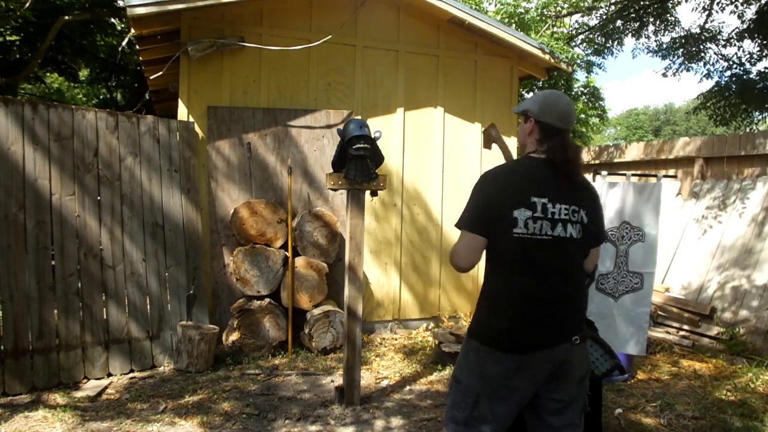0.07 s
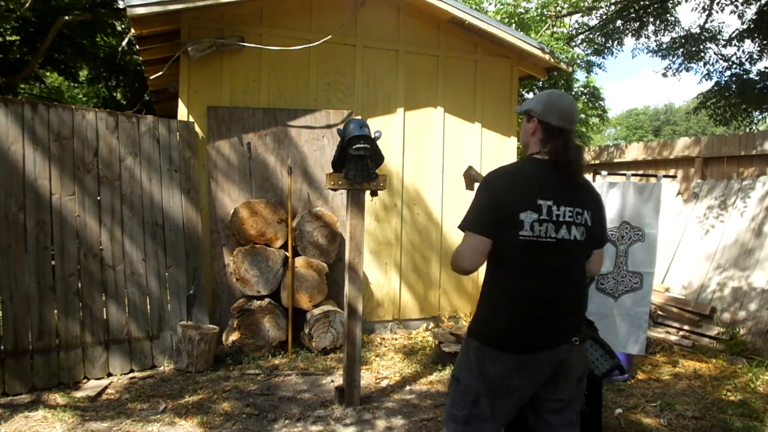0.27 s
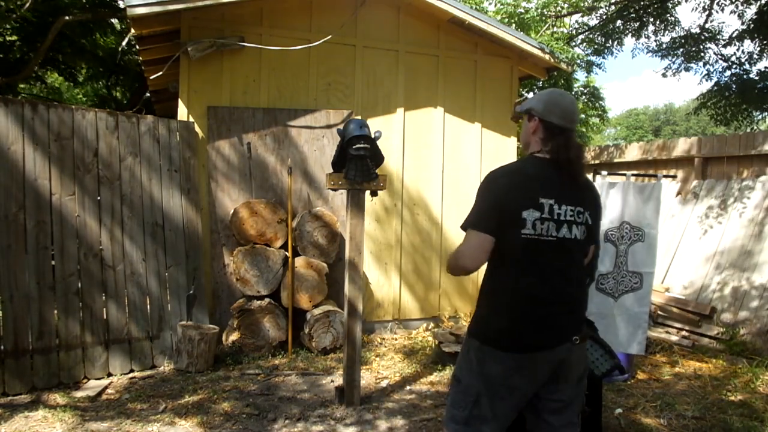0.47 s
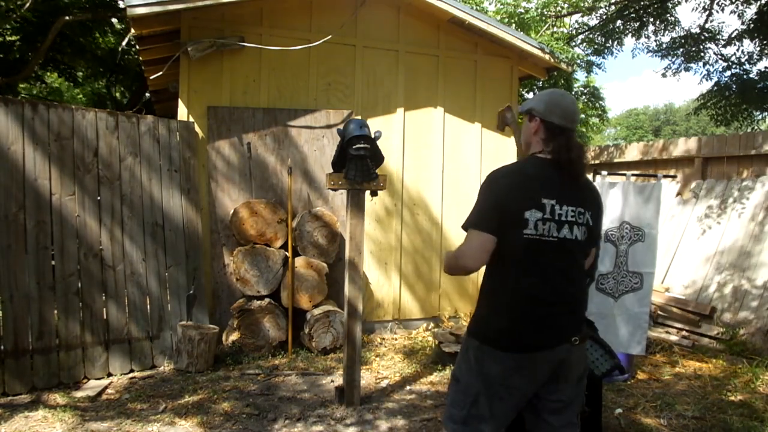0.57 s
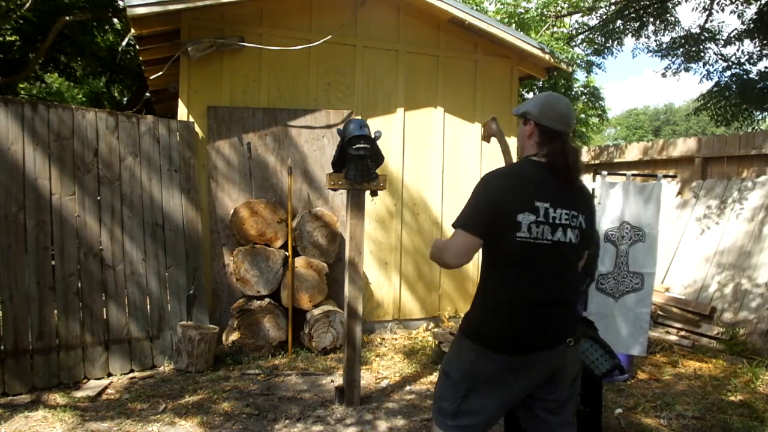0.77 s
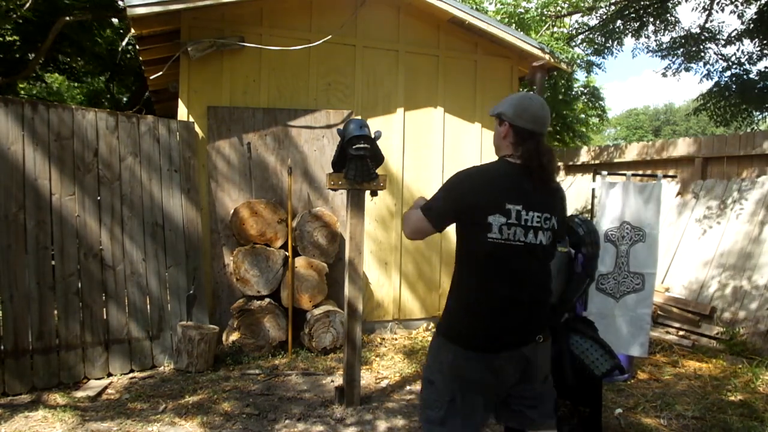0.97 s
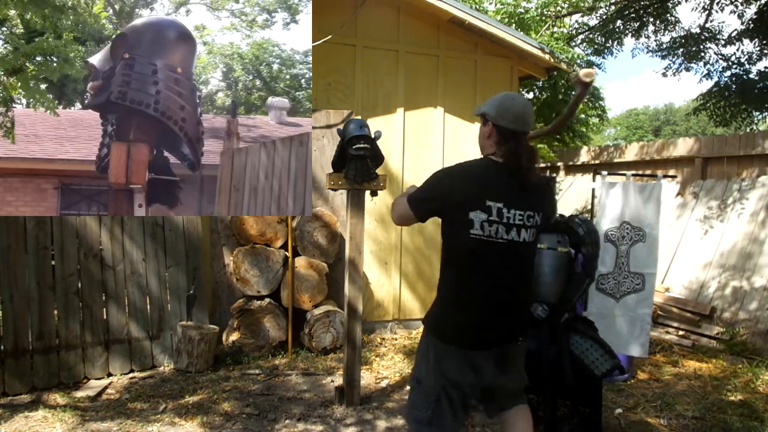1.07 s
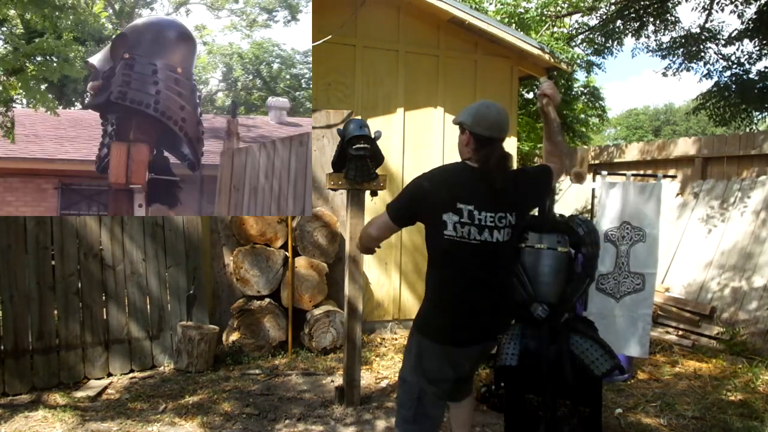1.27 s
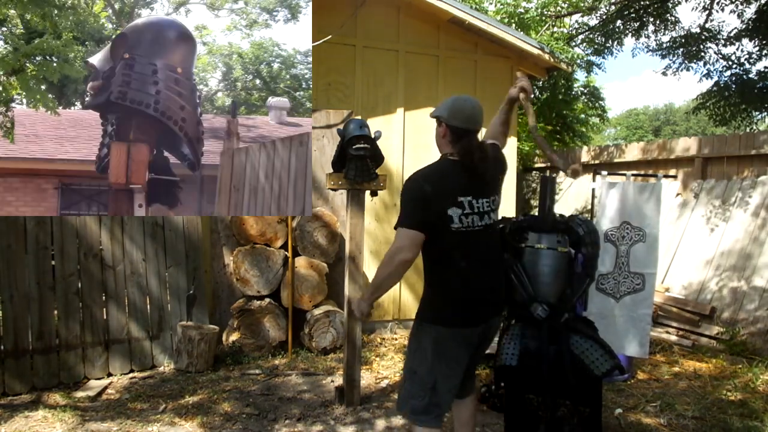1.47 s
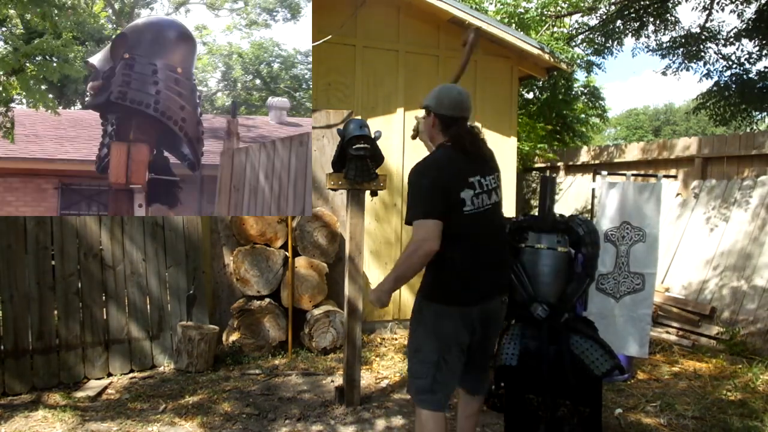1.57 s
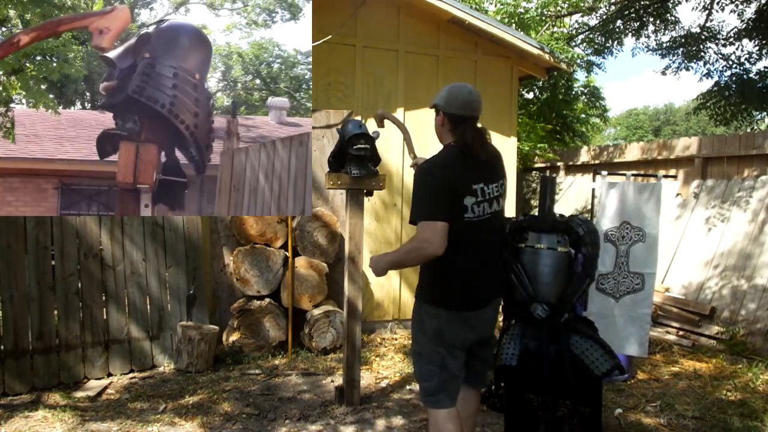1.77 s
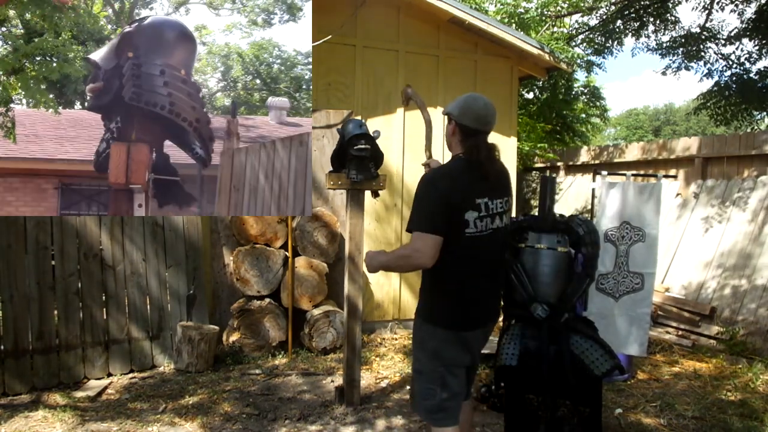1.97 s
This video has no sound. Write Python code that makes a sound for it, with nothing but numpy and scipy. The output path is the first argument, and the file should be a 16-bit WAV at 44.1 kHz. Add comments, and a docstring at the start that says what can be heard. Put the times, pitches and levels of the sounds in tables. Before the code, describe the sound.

A wooden club hits a steel helmet once, a loud sharp crack with woody thud and brief plate jangle, then yard echoes and faint dull knocks; beforehand only soft outdoor hiss and distant birds, in stereo.

```python
"""Wooden club on a steel helmet

In a fenced yard a club strikes a helmet on a post: noise cracks, and decaying sines give the wooden
thud, steel snap and short ring. Random clashes of small neck plates jangle. Shed and fences throw the
blow back as noise bursts and a diffuse tail, and a few dull two-mode knocks follow. Behind lie faint
distant birds, as gliding whistles, and an outdoor hiss of coloured noise that steps down before the blow."""
import sys
import numpy as np
from scipy import signal
from scipy.fft import rfft, irfft
from scipy.io import wavfile
from scipy.ndimage import uniform_filter1d

SR = 44100
rng = np.random.default_rng(int(sys.argv[2]) if len(sys.argv) > 2 else 0)


def persist_wave(psi):
    """Save psi, clipped to +-1, as 16-bit WAV."""
    counts = np.round(np.clip(psi, -1, 1) * 32767).astype(np.int16)
    wavfile.write(sys.argv[1], SR, np.atleast_2d(counts).T)


N = 89699  # samples

# Levels in the tables are relative: envelopes and layer gains act on them.
# Club on helmet, first contact and rebounds: (time [s], level [dB], T60 [s])
CONTACTS = [(1.6379, -7.5, 0.017), (1.6405, -7.5, 0.031), (1.6471, -11, .016)]
# Spectrum of each contact's crack: (frequency [Hz], level per Hz [dB])
CRACK_COLOUR = [(30, -25), (100, -24), (250, -14), (540, -13), (1150, 2.5), (1620, -2), (2470, -1.5),
                (3190, -7), (4320, -5.5), (5700, -10), (6740, -4.5), (10000, -12.5), (13000, -21),
                (16000, -44)]
# Left-right likeness of cracks and knock grit: (frequency [Hz], correlation [-1 to 1])
CRACK_LIKENESS = [(100, 0.89), (2000, 1), (15000, 0.64)]
# Ringing modes of club and post: (frequency [Hz], level [dB], T60 [s])
WOOD_MODES = [(200, -29, .18), (249, -20.5, .17), (290, -22, .16), (318, -22, .16), (560, -27, .18),
              (779, -25, .16), (861, -25, .18), (956, -24, .22), (1027, -25, .2), (1152, -22, .18),
              (1245, -21.5, .18)]
# Short, heavy modes of the thud: (frequency [Hz], level [dB], T60 [s])
THUD_MODES = [(277, -11, 0.05), (536, -18.5, 0.054), (1080, -9, 0.027)]
# Ringing modes of the helmet shell: (frequency [Hz], level [dB], T60 [s])
SHELL_MODES = [(908, -27, .33), (1431, -27, .28), (1476, -27.5, .33), (1602, -27, .3), (1749, -28, .3),
               (1879, -27, .32), (2016, -27, .26), (2249, -26.5, .27), (2466, -26, .28), (2577, -25, .28),
               (2781, -26, .28), (3382, -27, .28), (4713, -29, .26), (6459, -29.5, .25)]
# Bright, brief snap at first contact: (frequency [Hz], level [dB], T60 [s])
SNAP_MODES = [(3510, -4.5, 0.0096), (4340, 1, 0.008), (5280, -9.5, 0.012), (6720, -6.5, 0.016)]
# Reflections from ground, shed and fences: (time [s], level [dB], T60 [s])
ECHOES = [(1.6475, -17, 0.013), (1.6784, -13, 0.039), (1.685, -17, 0.079), (1.7128, -22, 0.091)]
# Spectrum of the reflections: (frequency [Hz], level per Hz [dB])
ECHO_COLOUR = [(35, -50), (100, -23), (220, -9), (450, -4), (900, -3), (1250, -3), (1900, -1), (3000, -8),
               (4000, -15), (4700, -13.5), (8900, -14), (16000, -36)]
# Spectrum of the diffuse tail: (frequency [Hz], level per Hz [dB])
TAIL_COLOUR = [(35, -45), (100, -20), (160, -16), (240, -6.5), (380, -5.5), (550, -5.5), (930, -3.5),
               (1200, -6), (1950, -7), (3500, -10.5), (4700, -8.5), (7200, -11), (9500, -14.5),
               (16000, -32.5)]
# Left-right likeness of echoes and tail: (frequency [Hz], correlation [-1 to 1])
TAIL_LIKENESS = [(100, 0.48), (300, 0.58), (700, 0.32), (1500, 0.52), (4000, 0.62), (8000, 0.2),
                 (15000, 0.64)]
# Decay of the yard across pitch: (frequency [Hz], T60 [s])
YARD_DECAY = [(100, 0.33), (250, 0.28), (600, 0.35), (1300, 0.37), (2700, 0.4), (5500, 0.33), (11000, 0.32)]
# Dull knocks after the blow: (time [s], level [dB], pitch [Hz], T60 [s])
KNOCKS = [(1.786, -33, 1270, .035), (1.8030, -21.5, 1320, 0.01), (1.81, -32, 1580, 0.022),
          (1.8750, -38, 1400, .025), (1.8790, -28, 1390, 0.015), (1.885, -27.5, 1440, 0.014),
          (1.8921, -33, 1467, 0.046), (1.9002, -38, 1560, 0.018)]
# Spectrum of the knocks' grit: (frequency [Hz], level per Hz [dB])
GRIT_COLOUR = [(40, -30), (250, -13), (700, -17), (1400, 0.5), (1800, -4), (2400, -20), (4300, -9),
               (7000, -26), (16000, -40)]
# Bird notes: (time [s], length [s], level [dB], final pitch [Hz], opening fall [Hz])
BIRD_NOTES = [(-.05, 0.088, -48.5, 2473, 200), (.36, 0.047, -51, 3360, 560), (0.397, .05, -52, 2650, 210),
              (.425, .04, -54, 4480, 140), (0.774, .075, -49, 2440, 310), (0.906, 0.067, -47, 1725, 10),
              (1.029, .11, -46, 2440, 260), (1.213, .07, -54, 2510, 160), (1.288, 0.056, -47, 2490, 197)]
# Hiss spectrum before the step: (frequency [Hz], level per Hz [dB])
AIR_EARLY_COLOUR = [(12, -15), (25, -3), (58, -1), (130, -5.5), (240, -4.5), (470, -5), (760, -4),
                    (1100, -7.5), (1650, -12), (2300, -15), (2950, -17.5), (6000, -20), (8000, -25.5),
                    (14700, -31), (16000, -32)]
# Hiss spectrum after the step: (frequency [Hz], level per Hz [dB])
AIR_LATE_COLOUR = [(12, -37), (20, 1.5), (79, -2), (285, -6.5), (410, -5), (849, -4.5), (2320, -16.5),
                   (2530, -14), (2910, -18), (3630, -18.5), (4540, -19), (14300, -33), (16000, -32)]
# Hiss level before the step: (time [s], level [dB])
AIR_EARLY_LEVEL = [(0, -42.5), (.7, -42.5), (1.05, -42), (1.33, -41.5)]
# Left-right likeness of the hiss: (frequency [Hz], correlation [-1 to 1])
AIR_LIKENESS = [(60, 0.053), (120, 0.18), (240, 0.19), (480, 0.27), (950, 0.25), (1890, 0.26), (3770, 0.27),
                (7520, 0.19), (15000, 0.0)]

HIT_S = 1.6373
WOOD_LAG_S, WOOD_RISE_S, WOOD_DB = 0.00048, 0.001, -1
SHELL_RISE_S, SNAP_RISE_S = 0.00045, 0.00023
PLATES_DB, PLATES_T60_S = -17.5, 0.27
CLASHES_PER_S = 900  # all plates together
PLATE_LOW_HZ, PLATE_HIGH_HZ, PLATE_RING_T60_S = 1598, 9950, 0.024
TAIL_DB, TAIL_RISE_S = -12.5, 0.015
KNOCK_RISE_S, GRIT_DB = 0.00082, -5.5
OVERTONE_RATIO, OVERTONE_DB = 1.255, -8
BIRD_SETTLE_S, BIRD_ROUGHNESS = 0.0249, 1.09  # roughness: rms share of the pitch fall
BIRD_ECHO_DB, BIRD_ECHO_T60_S = -7.5, 0.46
AIR_LATE_DB, AIR_STEP_S, PATCHY_DB, AIR_LEFT_DB = -47.5, 1.341, 1.5, 0.5
PORT_LAG_SAMPLES, RIGHT_DB = 2, 0.84
CEILING, EDGE_HZ = 0.87, 15950  # ceiling in full-scale amplitude


def amp(db):
    """Decibels to gain."""
    return 10 ** (np.asarray(db) / 20)


def evened(x):
    """Scales to rms 1."""
    return x / np.sqrt(np.mean(x ** 2) + 1e-20)


def read(points, hz):
    """Reads a table on a log-frequency axis."""
    f, value = np.transpose(points)
    return np.interp(np.log(hz + 1), np.log(abs(f) + 1), value)


def add(mix, s, sound):
    """Mixes a sound in at a time in seconds, trimming what falls outside."""
    at = round(s * SR)
    sound = sound[..., max(-at, 0):]
    part = mix[:, max(at, 0):][:, :sound.shape[-1]]
    part += sound[..., :part.shape[1]]


def clock():
    """One second of sample times."""
    return np.arange(SR) / SR


def fade(t60, rise):
    """Quick rise and exponential decay, losing 60 dB in each T60."""
    return (1 - np.exp(-clock() / rise)) * amp(-60 * clock() / t60)


def noise(colour, likeness, size=SR):
    """Coloured stereo noise of rms 1; mid and side shares set the left-right likeness."""
    hz = np.fft.rfftfreq(size, 1 / SR)
    a, b = rfft(rng.standard_normal((2, size)))
    same = np.clip(read(likeness, hz), -.99, .99)
    mid = a * np.sqrt(1 + same)
    side = b * np.sqrt(1 - same)
    spectrum = np.array([mid + side, mid - side]) * amp(read(colour, hz))
    return evened(irfft(spectrum, size))


def ring(modes, rise):
    """Decaying sine modes of a struck body."""
    return sum(amp(db) * fade(t60, rise) * np.sin(2 * np.pi * hz * clock()) for hz, db, t60 in modes)


def crack():
    """Each contact of club and helmet is a sharp, fast-dying noise burst."""
    out = np.zeros((2, N))
    for s, db, t60 in CONTACTS:
        add(out, s, amp(db) * fade(t60, rise=0.00012) * noise(CRACK_COLOUR, CRACK_LIKENESS))
    return out


def wood():
    """Club and post ring in low modes, under a shorter thud."""
    out = np.zeros((2, N))
    body = amp(WOOD_DB) * ring(WOOD_MODES, WOOD_RISE_S)
    thud = ring(THUD_MODES, WOOD_RISE_S)
    add(out, HIT_S + WOOD_LAG_S, body + thud)
    return out


def shell():
    """The steel shell snaps in bright, brief modes and rings in longer ones."""
    out = np.zeros((2, N))
    add(out, HIT_S, ring(SHELL_MODES, SHELL_RISE_S) + ring(SNAP_MODES, SNAP_RISE_S))
    return out


def plates(count=32):
    """Small neck plates clash at random, each with a few short modes, and settle."""
    out, jangle = np.zeros((2, N)), np.zeros((2, SR))
    for _ in range(count):
        pitches = PLATE_LOW_HZ * (PLATE_HIGH_HZ / PLATE_LOW_HZ) ** rng.random(size=5)
        clink = ring([(hz, 0, PLATE_RING_T60_S) for hz in pitches], rise=0.0001)
        struck = rng.random(SR) < CLASHES_PER_S / count / SR
        clashes = rng.standard_normal(SR) * struck
        sides = amp(rng.normal(0, 3.3, (2, 1)))  # each plate leans left or right
        jangle += sides * signal.fftconvolve(clashes, clink)[:SR]
    add(out, HIT_S, amp(PLATES_DB) * evened(jangle) * fade(PLATES_T60_S, rise=0.00075))
    return out


def yard(count=12):
    """Scattered echoes of the blow, then a diffuse tail in which each band dies at its own speed."""
    out = np.zeros((2, N))
    for s, db, t60 in ECHOES:
        add(out, s, amp(db) * fade(t60, rise=0.0012) * noise(ECHO_COLOUR, TAIL_LIKENESS))
    wash = rfft(noise(TAIL_COLOUR, TAIL_LIKENESS))
    hz = np.fft.rfftfreq(SR, 1 / SR)
    centres = np.geomspace(100, 14000, count)
    for centre, share in zip(centres, np.eye(count)):
        # Neighbouring bands cross-fade between their centres
        band = irfft(wash * read(np.c_[centres, share], hz), SR)
        add(out, HIT_S, amp(TAIL_DB) * band * fade(read(YARD_DECAY, centre), TAIL_RISE_S))
    return out


def knocks():
    """Short hollow knocks, two close modes with a little noisy grit."""
    out = np.zeros((2, N))
    for s, db, hz, t60 in KNOCKS:
        overtone = (hz * OVERTONE_RATIO, OVERTONE_DB, t60 / 2)
        body = ring([(hz, 0, t60), overtone], KNOCK_RISE_S)
        grit = amp(GRIT_DB) * fade(t60, KNOCK_RISE_S) * noise(GRIT_COLOUR, CRACK_LIKENESS)
        add(out, s, amp(db) * (body + grit))
    return out


def birds():
    """Distant whistles start rough and high, settle towards a pitch, and echo among the trees."""
    out, t = np.zeros((1, N)), clock()
    for s, length, db, hz, fall_hz in BIRD_NOTES:
        waver = BIRD_ROUGHNESS * evened(uniform_filter1d(rng.standard_normal(SR), size=120))
        pitch = hz + fall_hz * np.exp(-t / BIRD_SETTLE_S) * (1 + waver)
        arch = np.sqrt(np.maximum(np.sin(np.pi * np.minimum(t / length, 1)), 0))
        add(out, s, amp(db) * arch * np.sin(2 * np.pi * np.cumsum(pitch) / SR))
    trees = rng.standard_normal((2, SR)) * fade(BIRD_ECHO_T60_S, rise=0.01)
    trees /= np.linalg.norm(trees[0])
    echo = signal.fftconvolve(out, trees, axes=1)[:, :N]
    return out + amp(BIRD_ECHO_DB) * echo


def air():
    """Outdoor hiss with drifting patches; level and colour step abruptly before the blow."""
    t = np.arange(N) / SR
    early_gain = amp(np.interp(t, *np.transpose(AIR_EARLY_LEVEL)))
    early = early_gain * noise(AIR_EARLY_COLOUR, AIR_LIKENESS, size=N)
    late = amp(AIR_LATE_DB) * noise(AIR_LATE_COLOUR, AIR_LIKENESS, size=N)
    z = signal.stft(np.where(t < AIR_STEP_S, early, late), nperseg=512)[2]
    # Random gains, smoothed over pitch and then time, shared by both sides
    patches = uniform_filter1d(rng.standard_normal(z.shape[1:]), size=8, axis=0)
    patches = evened(uniform_filter1d(patches, size=12, axis=1))
    hiss = signal.istft(z * amp(PATCHY_DB * patches))[1][:, :N]
    return hiss * amp([[AIR_LEFT_DB], [0]])


def scene():
    """The blow, its echoes and knocks reach the left microphone port just before the right."""
    left, right = crack() + wood() + shell() + plates() + yard() + knocks()
    right = amp(RIGHT_DB) * np.roll(right, PORT_LAG_SAMPLES)
    return np.array([left, right]) + birds() + air()


def record(dry):
    """Soft overload rounds the loud peaks, then a low-pass sets the band limit."""
    squeezed = dry / (1 + (dry / CEILING) ** 4) ** (1 / 4)
    lowpass = signal.firwin(511, EDGE_HZ, window=("kaiser", 9), fs=SR)
    return signal.oaconvolve(squeezed, lowpass[None], "same")


dry = scene()
out = record(dry)
persist_wave(out)
```